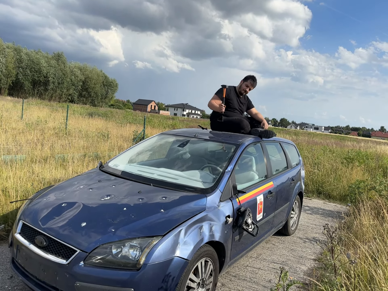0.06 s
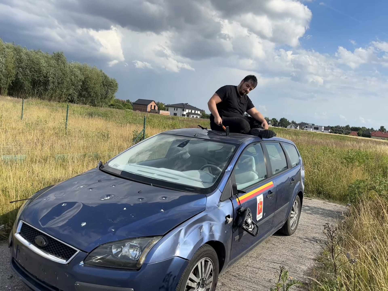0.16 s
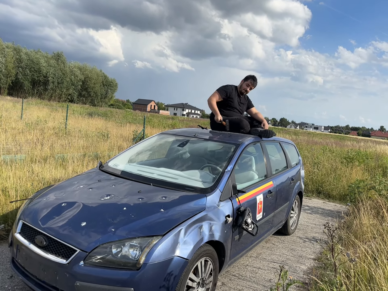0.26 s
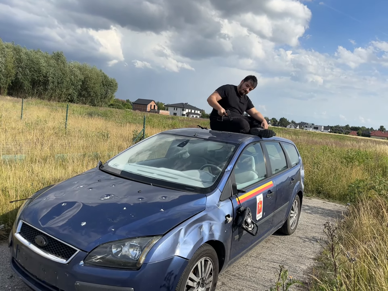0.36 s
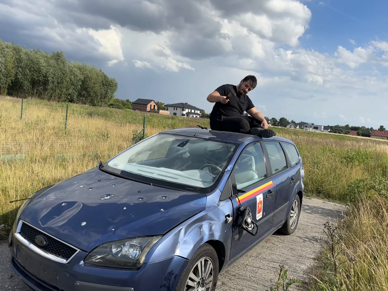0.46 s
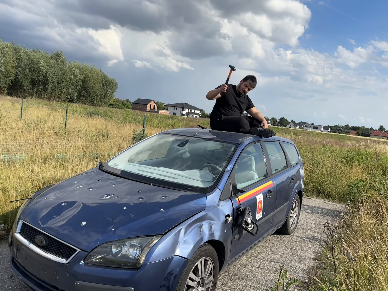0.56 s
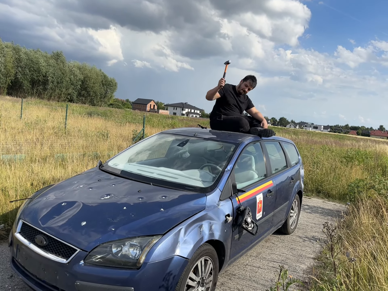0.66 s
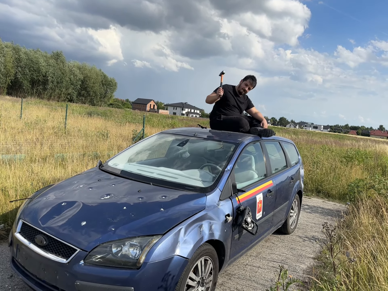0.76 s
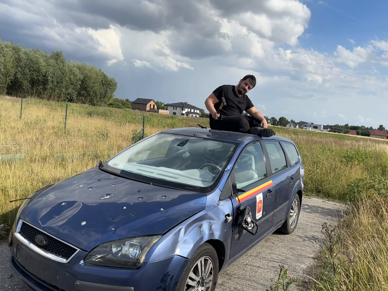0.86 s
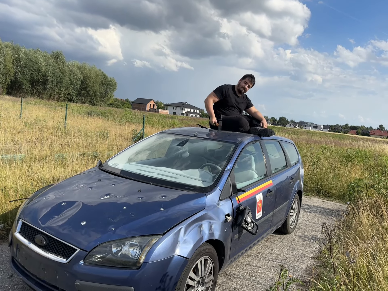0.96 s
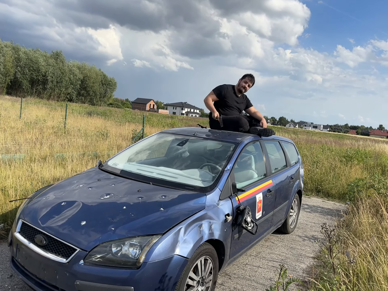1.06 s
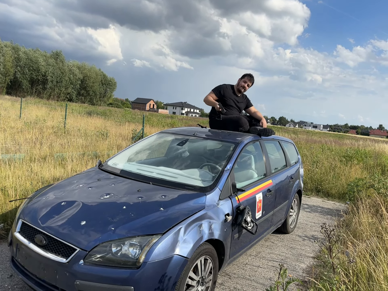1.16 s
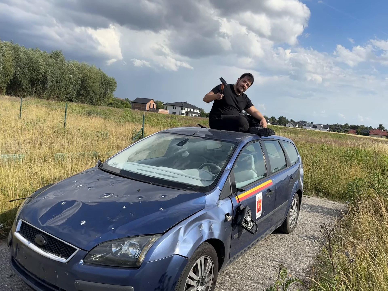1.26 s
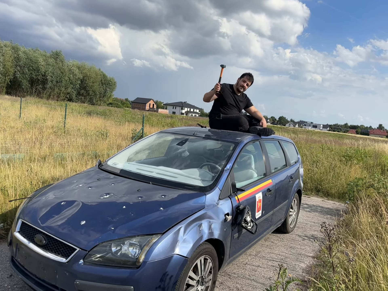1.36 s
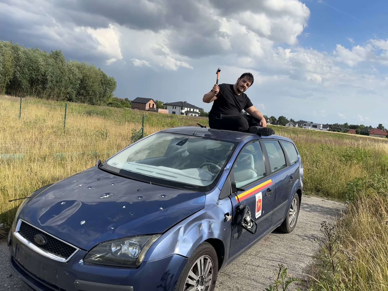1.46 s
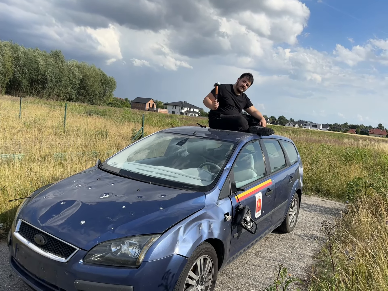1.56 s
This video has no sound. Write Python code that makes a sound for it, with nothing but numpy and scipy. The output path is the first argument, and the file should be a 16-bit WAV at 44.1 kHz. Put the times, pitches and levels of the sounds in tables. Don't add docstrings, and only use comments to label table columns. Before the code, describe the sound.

A hammer bangs a dented car roof twice, the first blow harder with a longer rattle, the second slightly softer. Quiet field hiss and distant machine hum dip after the hits; single-channel microphone outdoors, peaks softly squashed.

```python
import sys
import numpy as np
from scipy import signal
from scipy.fft import rfft, irfft, next_fast_len
from scipy.io import wavfile
from scipy.ndimage import map_coordinates

SR = 44100
rng = np.random.default_rng(int(sys.argv[2]) if len(sys.argv) > 2 else 0)


def rack_gain(trim_db):
    fader = np.asarray(trim_db, float)
    return 10 ** (fader / 20)


def pcm_store(signal):
    levels = np.round(np.clip(np.atleast_2d(signal), -1, 1) * 32767)
    wavfile.write(sys.argv[1], SR, levels.astype(np.int16).T)


N = 70560

# [t/s, wave peak level/dB, crack level/dB, lateness of the bending wave at 200 Hz/s]
BLOWS = [
    (.2126, -1.5, -12, 0.00447),
    (.962, -2.5, -13, .005),
]
# [f/Hz, level/dB]
HAMMER_FACE = [(1200, -44), (2400, 12.5), (3500, 0), (5500, -5.5), (7500, -17.5), (11000, -10.5),
               (15000, -11), (16000, -8), (16800, -47)]


def hammer_crack():
    crack, t = np.zeros(N + SR), np.arange(SR // 8) / SR
    crack_t60_s, snap_db, snap_t60_s = 0.026, -3.5, 0.0028
    for s, _, crack_db, _ in BLOWS:
        fade = rack_gain(-60 * t / crack_t60_s) + rack_gain(snap_db - 60 * t / snap_t60_s)
        add(crack, s, rack_gain(crack_db) * fade * rng.standard_normal(len(t)))
    return filtered(crack[:N], causal(HAMMER_FACE))


# [f/Hz, level/dB]
WAVE = [(25, -60), (60, -26), (120, 12.5), (230, 8.5), (550, 2.5), (820, 4), (1400, 0), (2100, -13.5),
        (6000, -41), (9000, -120)]


def bending_wave():
    wave, t = np.zeros(N + SR), np.arange(SR // 8) / SR
    wave_db = 18.5
    slowing = 0.68
    for s, peak_db, _, late_s in BLOWS:
        scrape = 0.29 * rack_gain(-60 * t / 0.01) * rng.standard_normal(len(t))
        push = scrape + (t == 0)

        def bend(hz):
            turns = late_s * 200 ** slowing * hz ** (1 - slowing) / (1 - slowing)
            return causal(WAVE)(hz) * np.exp(-2j * np.pi * turns)

        add(wave, s, rack_gain(peak_db + wave_db) * filtered(push, bend))
    return wave[:N]


# [t/s, tick level/dB, panel level/dB, dent f/Hz]
RATTLE = [(0.2143, -41, -8, 870), (.231, -29, -12, 975), (.2373, -71, -13.5, 1550),
          (0.2429, -32, -13, 547), (.2570, -55, -17, 1116), (0.2676, -52, -14, 518),
          (0.276, -25, -11.5, 309.7), (0.2799, -12.5, -6.5, 1194), (0.2869, -28, -15.5, 288.5),
          (.293, -31, -17.5, 385), (0.3056, -32, -30, 327), (0.3105, -29.5, -24.5, 503),
          (0.3242, -50, -48, 523), (0.3466, -37, -52, 343), (0.3687, -40, -44.5, 385),
          (0.3737, -47, -46, 330), (.387, -53, -61, 400), (0.771, -50, -71, 405),
          (.964, -41, -6, 694), (0.9753, -32, -10.5, 1270), (0.9914, -36, -16, 1026),
            (1.0004, -46, -21, 397), (1.0074, -23, -12, 1068), (1.0135, -30, -21, 1110),
            (1.0190, -29, -19, 337.6), (1.0250, -28, -12, 426), (1.0314, -21.5, -15, 338),
            (1.0403, -45, -20, 406), (1.048, -28, -21.5, 445), (1.061, -39, -24.5, 333),
            (1.071, -42, -27.5, 312), (1.0744, -41, -46, 585), (1.093, -41, -33.5, 307),
            (1.103, -46, -64, 382), (1.1229, -58, -47, 316)]
# [f/Hz, level/dB]
PANEL = [(29, -48), (50, -0.5), (485, -1), (711, -2.5), (1210, 3), (1340, 0), (1590, 0.5), (3010, -25.5),
         (8000, -46.5), (10400, -58), (17600, -120)]
# [f/Hz, level/dB]
TRIM = [(1500, -51), (3000, 2.5), (4500, 2), (6000, -6), (8000, -12.5), (12000, -9), (15300, -5.5),
        (16000, -27), (16600, -66)]


def shudder():
    sheet, trim, ringing = np.zeros(N + SR), np.zeros(N + SR), np.zeros(N + SR)
    for s, tick_db, panel_db, dent_hz in RATTLE:
        stir_db = panel_db + 3.5 * np.log2(dent_hz / 700)
        add(trim, s, trim_tick(tick_db, stir_db))
        add(sheet, s, rack_gain(stir_db + 27) * dense_ring())
        add(ringing, s, rack_gain(panel_db) * (roof_ring() + dent_ring(dent_hz)))
    return filtered(sheet[:N], causal(PANEL)) + filtered(trim[:N], causal(TRIM)) + ringing[:N]


# [f/Hz, time to fall 60 dB/s]
PANEL_T60 = [(60, .25), (300, 0.22), (700, 0.16), (1500, 0.048), (3000, 0.12), (8000, 0.045)]


def dense_ring():
    hz, t, bands = signal.stft(rng.standard_normal(SR // 4), SR, nperseg=128)
    fade = rack_gain(-60 * t / along(PANEL_T60, hz)[:, None])
    ring = signal.istft(bands * fade, SR, nperseg=128)[1]
    return ring / np.linalg.norm(ring)


def trim_tick(tick_db, stir_db):
    t = np.arange(SR // 2) / SR
    tick = rack_gain(tick_db - 60 * t / 0.0091) * (1 - np.exp(-t / 0.001))
    buzz = rack_gain(stir_db - 34 - 60 * t / 0.04) * (1 - np.exp(-t / 0.0021))
    return (tick + buzz) * rng.standard_normal(len(t))


def dent_ring(dent_hz):
    t = np.arange(SR // 2) / SR
    tone = rack_gain(2 - 60 * t * dent_hz / 30) * np.sin(2 * np.pi * dent_hz * t)
    return tone * (1 - np.exp(-t / 0.0021))


# [f/Hz, level/dB, time to fall 60 dB/s]
ROOF = [(213, -27, 0.28), (309, -14.5, 0.51), (420.3, -5.5, 0.38), (468, -19.5, 0.62), (549, -22, 0.29),
        (558.8, -3.5, 0.2), (590, -24, 0.093), (782, -6, 0.16), (910, -30, 0.53), (972, -8, 0.079)]


def roof_ring():
    t = np.arange(SR // 2) / SR
    roof_db, rise_s, detune = -16.5, 0.0027, 0.04
    hz, level_db, t60 = np.transpose(ROOF)[:, :, None]
    fade = rack_gain(level_db + 2 * rng.standard_normal(hz.shape) - 60 * t / t60)
    bent_hz = hz * (1 + detune * rng.standard_normal(hz.shape))
    notes = fade * np.sin(2 * np.pi * (bent_hz * t + rng.random(hz.shape)))
    return rack_gain(roof_db) * notes.sum(0) * (1 - np.exp(-t / rise_s))


# [f/Hz, width/Hz, level/dB]
DRONE = [(1325, 26.5, -6), (713, 75, -6.5), (403, 120, -10.5), (269, 13, -23)]


def far_machine():
    drone = np.zeros(N)
    for hz, width, level_db in DRONE:
        noise = rng.standard_normal(N)
        band = unit(filtered(noise, lambda f: np.exp(-((f - hz) / width) ** 2)))
        drone += rack_gain(level_db + 1.05 * wobble(11.3)) * band
    return drone


# [f/Hz, level/dB]
FIELD = [(120, -24), (200, -25.5), (288, 1), (488, -10), (704, -16), (825, -12.5), (1350, -13.5),
         (1690, -18.5), (9000, -66), (11700, -97.5), (19800, -120)]


def grass():
    return rack_gain(3.5 + 1.2 * wobble(8.37)) * rush(FIELD)


# [f/Hz, level/dB]
RUMBLE = [(15, -60), (25, -34), (40, -17.5), (65, 1), (134, 0), (194, -12), (260, -10), (340, -24),
          (570, -120)]
# [t/s, level/dB]
GUSTS = [(0, -38), (.051, -35), (.181, -42), (.421, -46), (.531, -41), (.601, -43), (.661, -45),
         (.701, -41), (.801, -44), (.861, -40), (.941, -42), (1.181, -44), (1.301, -50), (1.371, -42),
         (1.441, -53), (1.511, -45), (1.561, -53), (1.6, -44)]


def wind():
    return over_time(GUSTS) * rack_gain(2.5) * unit(rack_gain(1.5 * wobble(13.38)) * rush(RUMBLE))


# [f/Hz, level/dB]
INSECTS = [(7000, -120), (9000, -21), (12000, -8.5), (13500, -5), (15000, -5), (16000, -5), (16500, -120)]
# [t/s, level/dB]
INSECT_LEVEL = [(0, -86), (.5, -87), (.9, -92), (1.1, -105), (1.6, -108)]


def insects():
    return over_time(INSECT_LEVEL) * rack_gain(2) * unit(rack_gain(2.5 * wobble(150)) * rush(INSECTS))


# [f/Hz, level/dB]
HISS = [(1500, -120), (2500, 3), (3500, -1.5), (5000, -9.5), (7000, -24), (9000, -29.5), (11000, -48),
        (13000, -120)]


def steady_hiss():
    return rack_gain(-72) * rush(HISS)


# [t/s, level/dB]
GAIN = [(0.0, -44), (0.154, -44), (0.316, -57), (0.548, -47), (0.748, -48), (0.94, -45.5), (1.074, -56),
        (1.26, -55), (1.6, -57)]


def background():
    return over_time(GAIN) * (grass() + far_machine()) + wind() + insects() + steady_hiss()


def unit(x):
    return x / np.sqrt(np.mean(x ** 2) + 1e-20)


def along(points, hz):
    f, v = np.transpose(points)
    return np.interp(np.log(hz + 1), np.log(f + 1), v)


def over_time(rows):
    return rack_gain(np.interp(np.arange(N) / SR, *np.transpose(rows)))


def wobble(rate):
    return map_coordinates(rng.standard_normal(400), [np.arange(N) * rate / SR])


def filtered(x, response):
    m = next_fast_len(x.shape[-1] + 8192)
    spectrum = rfft(x, m) * response(np.fft.rfftfreq(m, 1 / SR))
    return irfft(spectrum, m)[..., :x.shape[-1]]


def causal(points):
    def response(hz):
        c = irfft(np.log(rack_gain(along(points, hz)) + 1e-5))
        c[1:len(c) // 2] *= 2
        c[len(c) // 2 + 1:] = 0
        return np.exp(rfft(c))
    return response


def rush(colour):
    return unit(filtered(rng.standard_normal(N), lambda hz: rack_gain(along(colour, hz))))


def add(track, s, sound):
    track[round(s * SR):][:len(sound)] += sound


def scene():
    return (hammer_crack() + bending_wave() + shudder() + background())[None]


def low_pass(x):
    return signal.sosfilt(signal.butter(12, 16860, fs=SR, output="sos"), x)


def record(dry):
    peak_limit = 0.72
    mix = dry / (1 + np.abs(dry / peak_limit) ** 4) ** (1 / 4)
    return low_pass(mix)


dry = scene()
out = record(dry)
pcm_store(out)
```